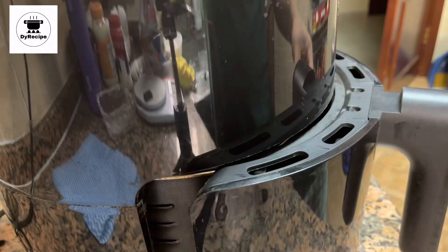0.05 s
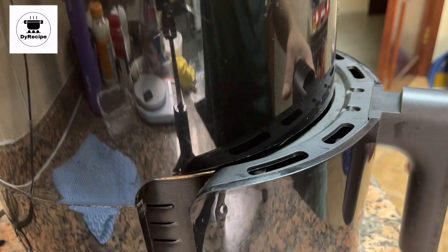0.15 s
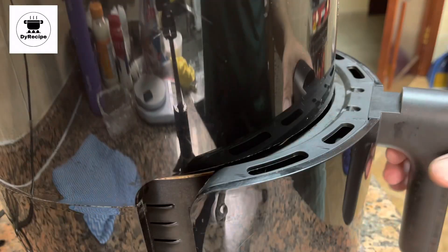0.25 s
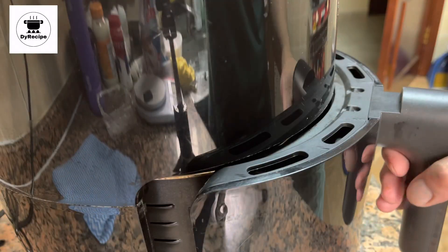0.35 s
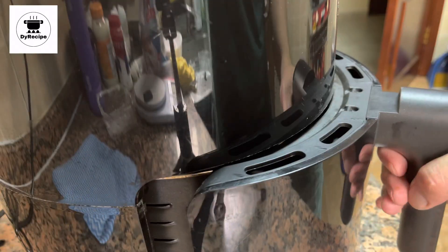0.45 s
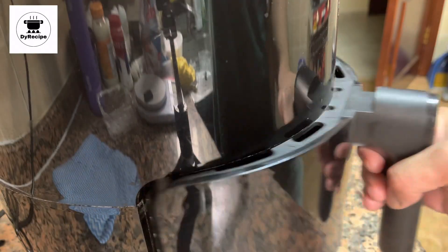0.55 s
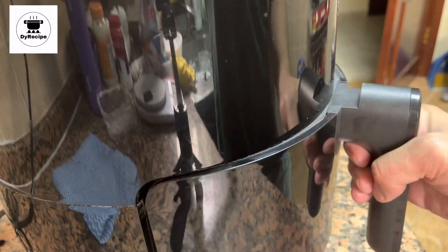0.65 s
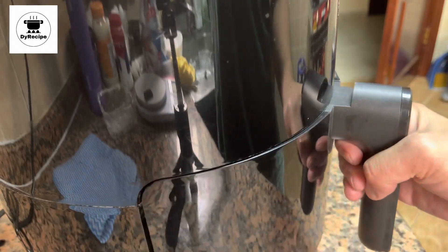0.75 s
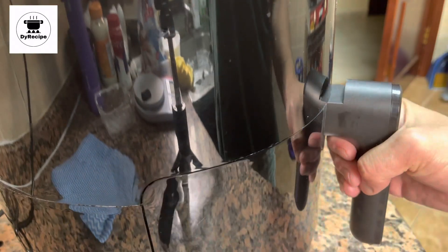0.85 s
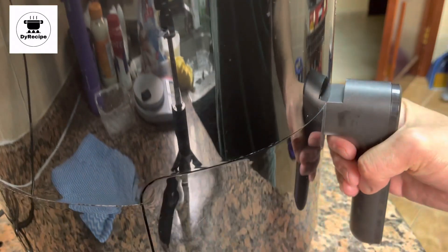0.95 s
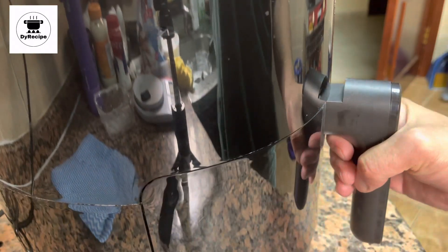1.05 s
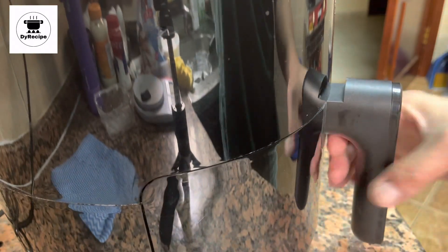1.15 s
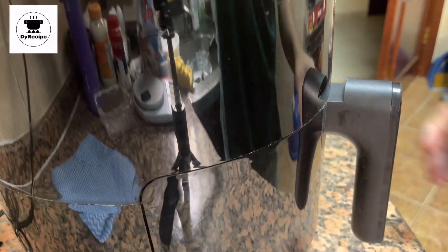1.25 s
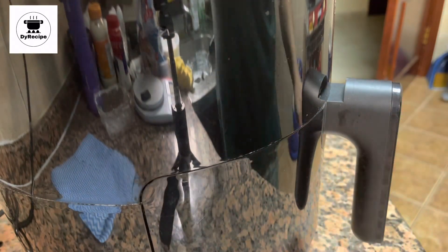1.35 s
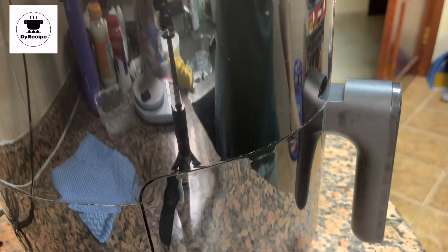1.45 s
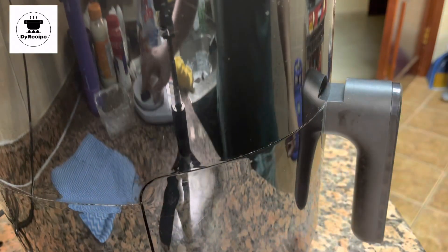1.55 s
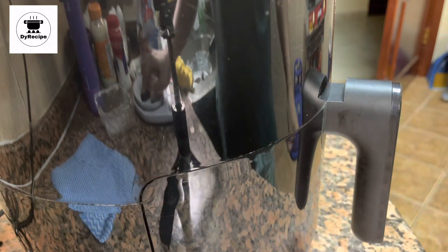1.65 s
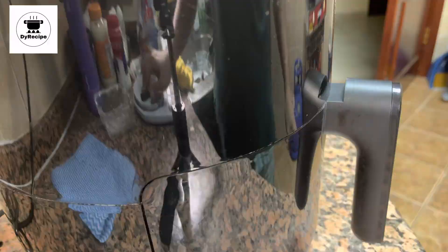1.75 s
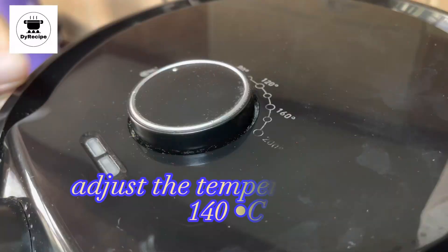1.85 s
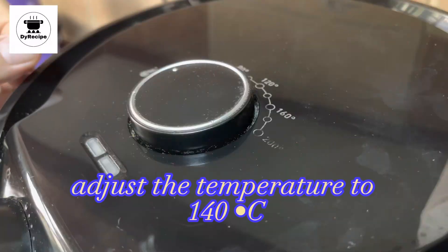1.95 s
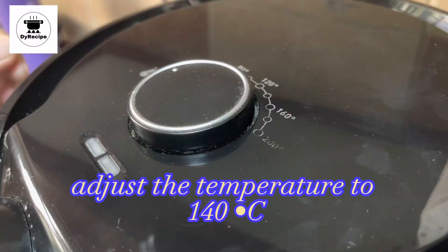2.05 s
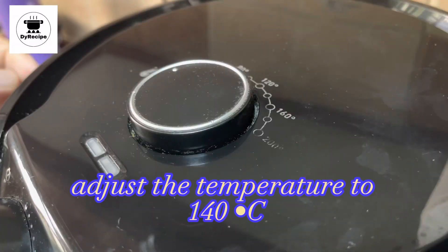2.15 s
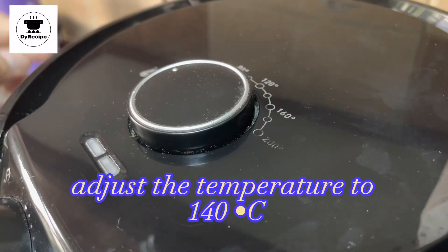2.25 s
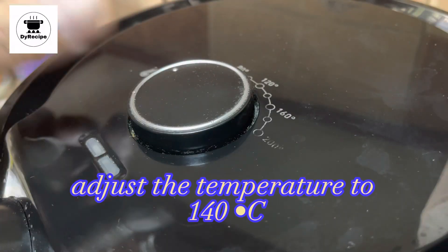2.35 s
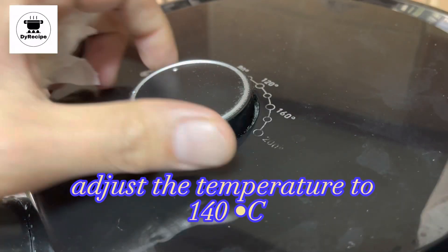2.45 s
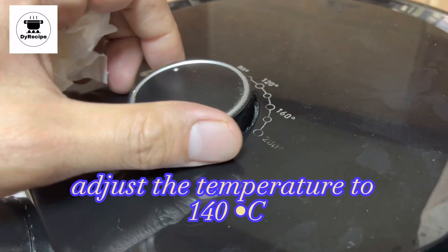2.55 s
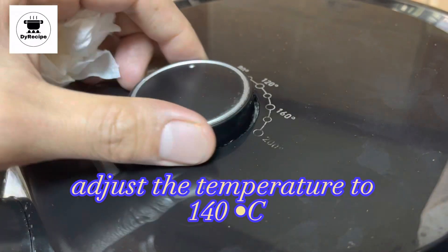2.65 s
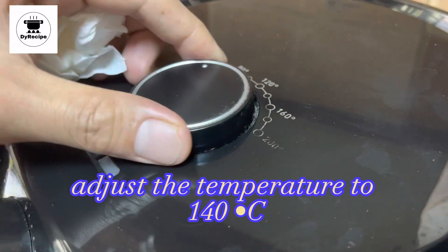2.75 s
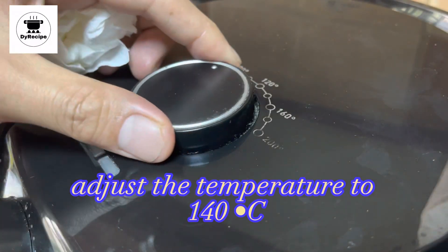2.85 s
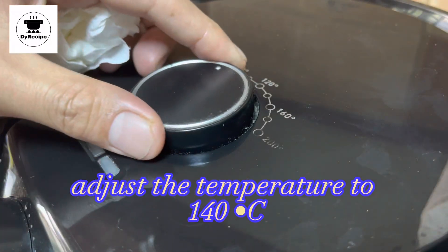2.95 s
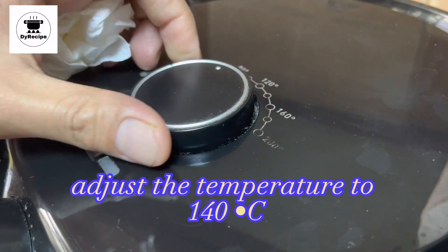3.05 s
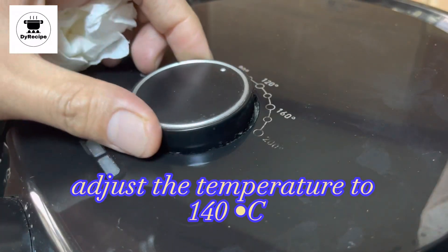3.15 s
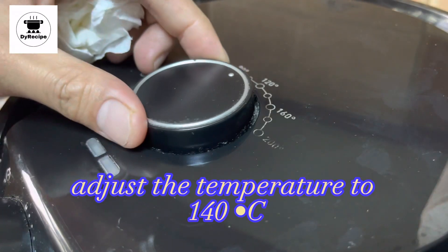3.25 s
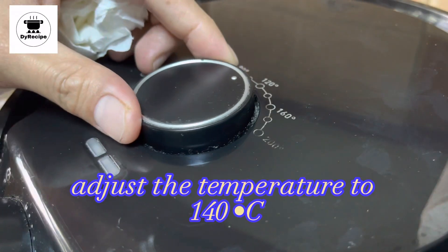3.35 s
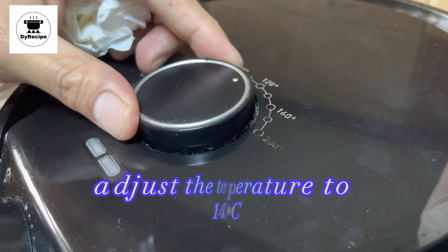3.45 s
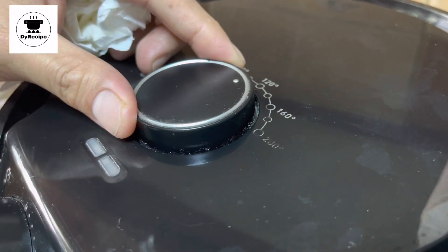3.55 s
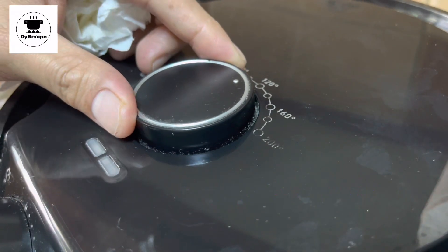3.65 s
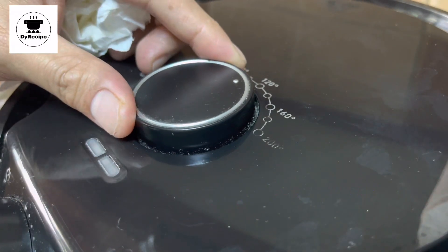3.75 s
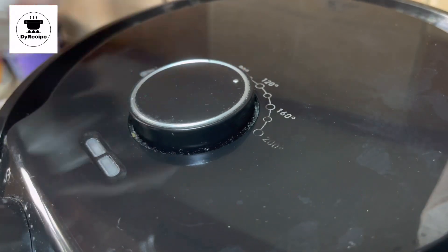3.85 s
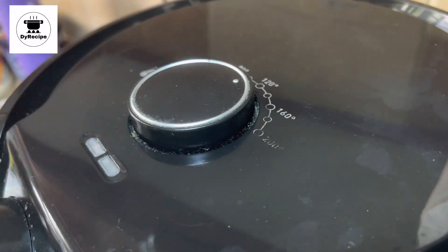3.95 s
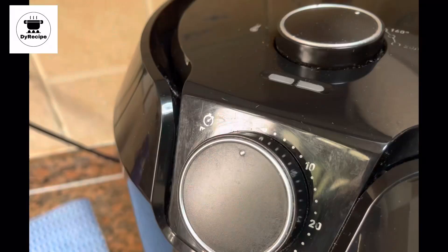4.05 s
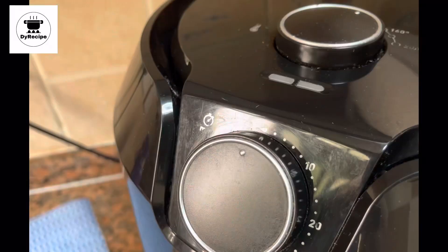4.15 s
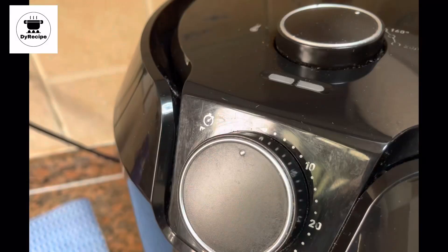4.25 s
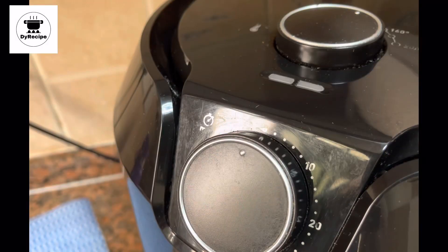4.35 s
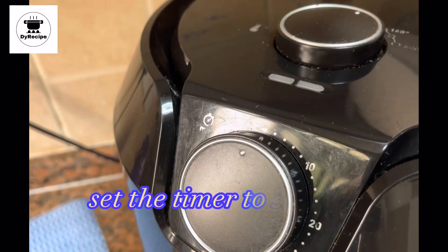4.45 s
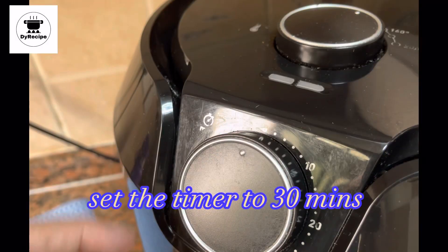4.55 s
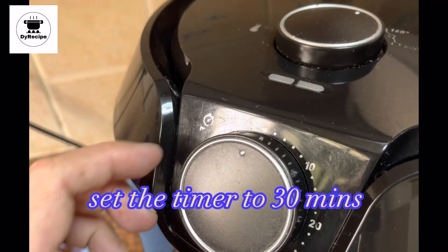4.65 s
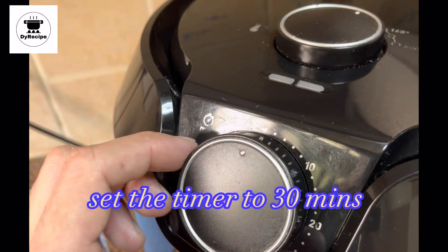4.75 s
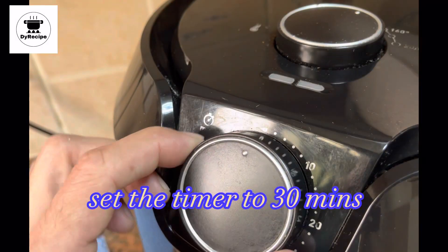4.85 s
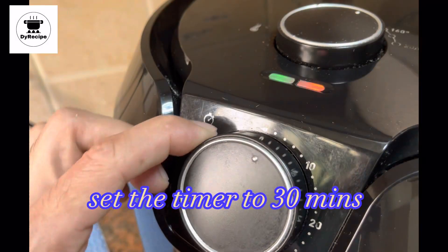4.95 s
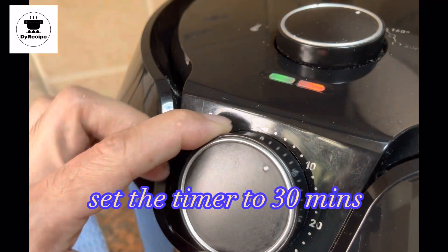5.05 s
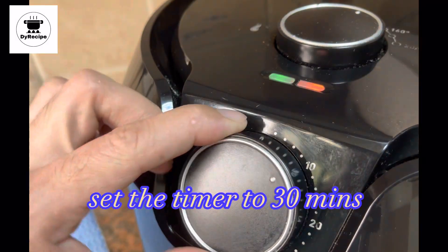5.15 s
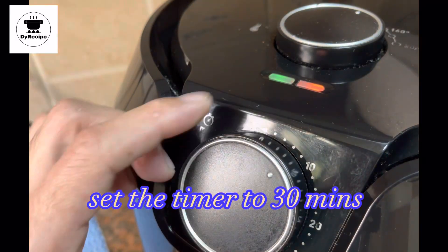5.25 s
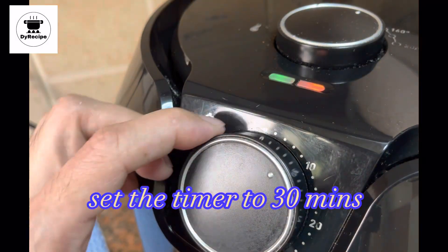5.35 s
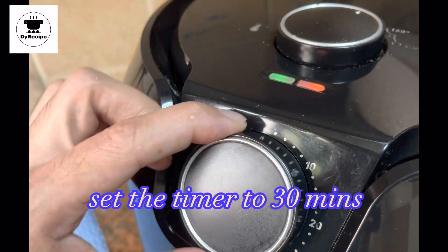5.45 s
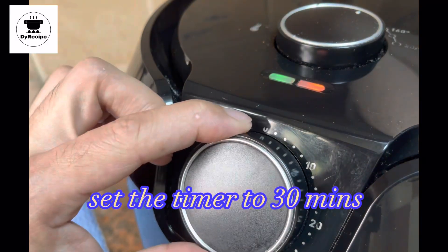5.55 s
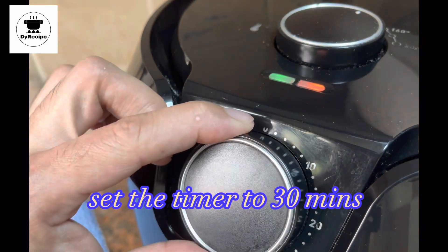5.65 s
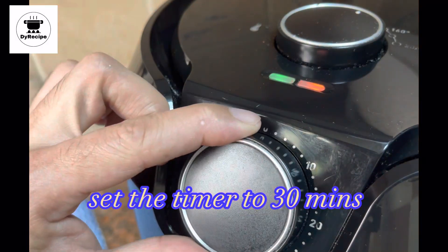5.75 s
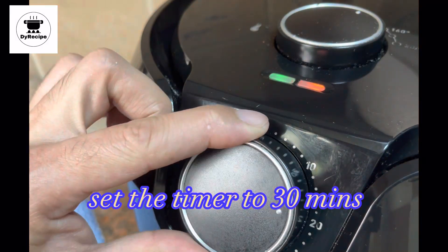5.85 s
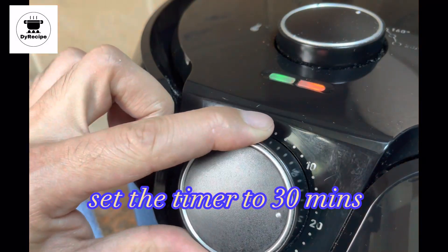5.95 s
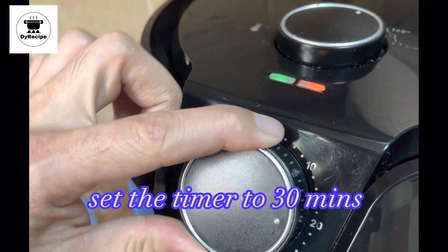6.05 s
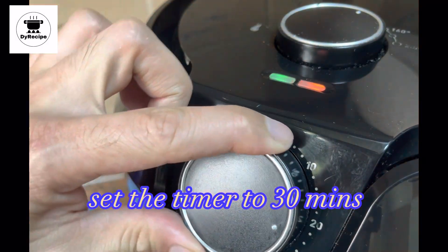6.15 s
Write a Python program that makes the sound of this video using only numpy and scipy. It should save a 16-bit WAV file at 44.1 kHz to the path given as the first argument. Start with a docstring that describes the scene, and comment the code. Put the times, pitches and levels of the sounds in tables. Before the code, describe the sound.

In a kitchen, close to the microphone, an air fryer basket rattles along its guides, catches and seats with a hollow clunk. Quiet low room rumble follows, with small finger taps and faint rubbing on a plastic knob. Then a wound timer rasps and ticks quickly, a switch snaps, and the motor hums as its fan climbs in pitch to a steady whir.

```python
"""An air fryer on a kitchen counter, close by: its basket scrapes in, catches twice and seats with a clunk.
Basket and housing are sets of fading tones set off by knocks and by uneven rubbing noise.
Fingers tap and rub the temperature knob, then wind the clockwork timer, which rasps and ticks.
The motor starts to hum, and its nine-blade fan runs up to a steady whir of blade tones and air noise.
Behind it lie a rumble, a drone and a thin hiss that step in level."""
import sys
import numpy as np
from scipy import signal
from scipy.fft import rfft, irfft, next_fast_len
from scipy.io import wavfile
from scipy.ndimage import map_coordinates

SR = 44100
rng = np.random.default_rng(int(sys.argv[2]) if len(sys.argv) > 2 else 0)


def put_to_file(sound):
    """Save the sound as 16-bit audio at rate SR, in the file named by the first command-line argument."""
    columns = np.atleast_2d(sound).T  # one column per channel
    safe = np.clip(columns, -1, 1)
    whole_steps = np.round(safe * 32767)
    wavfile.write(sys.argv[1], SR, whole_steps.astype(np.int16))


N = 272979  # length in samples
TOP_HZ = 15800  # upper limit of the sound

# basket hitting its guides and latch: (t/s, ring level/dB, thud level/dB, dull above f/Hz)
BASKET_KNOCKS = [(0.5891, -29.5, -24.5, 1800), (.599, -36.5, -27.5, 1800), (0.6066, -32.5, -23.5, 1900),
                 (0.7055, -46, -39, 4000), (0.7161, -39.5, -33.5, 5000), (.722, -37.5, -27, 3000),
                 (0.733, -38.5, -30, 1800), (0.849, -39, -29, 7000), (0.855, -32.5, -25.5, 7000),
                 (0.861, -25.5, -25, 6000), (0.8693, -23, -21, 8000), (.876, -27.5, -27, 7000)]
# basket rubbing along the guides; rise and fall are times for 60 dB:
# (peak t/s, shudder level/dB, rasp level/dB, rise t/s, fall t/s)
BASKET_SCRAPES = [(0.485, -56.5, -69.5, 0.16, 0.5), (0.535, -50.5, -52.5, 0.042, 0.21),
                  (.598, -43.5, -46.5, 0.28, 0.16), (0.717, -29.5, -39, 0.085, 0.09),
                  (0.854, -27, -29, 0.033, 0.076), (0.868, -27, -22.5, 0.03, 0.073),
                  (0.907, -49.5, -57, 0.15, 0.18), (1.114, -57, -63, 0.24, 0.22)]
# colour of plastic rubbing on metal: (f/Hz, level/dB)
RASP_COLOUR = [(500, -18), (1200, -5.5), (2000, -1), (3000, -3), (4000, -7.5), (5200, -5), (6300, -8.5),
               (7700, -4.5), (9300, -5), (11600, -8.5), (13500, -41)]
KNOCK_LOW_HZ = 85  # the knocks carry little below this


def basket(grit_db=3, judder_db=2, thud_db=9.5):
    """Knocks and stick-slip shudder ring the basket, differently each time; the rubbing also rasps directly."""
    now, knocks, rubbing, rasp = clock(), np.zeros((2, N)), 0, 0
    for s, ring_db, dense_db, dull_hz in BASKET_KNOCKS:
        blow = amp(ring_db) * ring() + amp(dense_db) * thud()
        band = (KNOCK_LOW_HZ, min(dull_hz, TOP_HZ))
        b, a = signal.butter(2, band, 'bandpass', fs=SR)
        add(knocks, s, signal.lfilter(b, a, blow))
    # fine grit and slower judder make the rubbing uneven
    slips = unit(amp(grit_db * wobble(900) + judder_db * wobble(150)))
    force = slips * rng.standard_normal(N)
    for s, shudder_db, rasp_db, rise, fall in BASKET_SCRAPES:
        push = fade(abs(now - s), np.where(now < s, rise, fall))
        body = ring() + amp(thud_db) * thud()
        body = body / np.linalg.norm(body.mean(0))
        shudder = signal.oaconvolve((push * force)[None], body, axes=1)[:, :N]
        rubbing = rubbing + amp(shudder_db) * shudder
        rasp = rasp + amp(rasp_db) * push
    rasp_noise = boxed(noise(RASP_COLOUR, -1.2), t60=0.055, wet_db=-1)
    return pan(5.5) * (knocks + rubbing) + pan(2) * rasp * slips * rasp_noise


# modes of the basket in its housing: (f/Hz, level/dB, 60 dB decay t/s)
BASKET_MODES = [(368, -8, .06), (500, -4, .09), (560, -11, .06), (625, -5, .08), (676, 0, .06),
                (796, 4, .06), (977, -3, .07), (1092, -12, .06), (1342, -13, .06), (1520, -13, .07),
                (1581, -11, .07), (1790, -19, .06), (1924, -16, .07), (2065, -20, .06), (2482, -15, .08),
                (2770, -20, .06), (2950, -17, .05), (3260, -18, .05), (4170, -21, .06)]


def ring(spread=0.88, vary_db=2, detune=0.0024):
    """The basket's answer to one blow: its modes shift with each blow and differ in phase left and right."""
    t, out = clock()[:SR // 5], 0
    for hz, db, t60 in BASKET_MODES:
        level = amp(db + vary_db * rng.standard_normal())
        cycles = hz * (1 + detune * rng.standard_normal()) * t + rng.random()
        side_phase = spread * rng.standard_normal((2, 1))
        out = out + level * fade(t, t60) * np.sin(2 * np.pi * cycles + side_phase)
    return out


# colour of the basket's dense, quickly damped modes: (f/Hz, level/dB)
THUD_COLOUR = [(30, -19.5), (90, -1), (250, 1.5), (350, -1.5), (470, -3.5), (620, 5), (1000, 0.5),
               (1700, -4), (2500, -11.5), (6000, -24.5), (12000, -42.5), (14000, -67.5)]


def thud(t60=0.025):
    """The basket's dense modes, which die at once, as a short burst of noise."""
    t = clock()[:SR // 5]
    return fade(t, t60) * noise(THUD_COLOUR, 0.081, size=len(t))


# hollow booms of the housing: (t/s, f/Hz, level/dB, swell t/s, 60 dB decay t/s)
HOUSING_BOOMS = [(0.587, 240.3, -17.5, 0.02, 0.11), (0.591, 162.5, -22.5, 0.0054, 0.13),
                 (.708, 190.7, -26, 0.034, 0.057), (.718, 120, -26.5, 0.018, .06),
                 (0.859, 192.3, -19, 0.019, 0.069), (0.857, 116.7, -19.5, 0.0086, 0.13)]
LINGER_HZ, LINGER_DB, LINGER_T60 = 199.4, -48.5, 2.5  # the shell rings on after the basket seats; T60 in s


def housing(lag_s=.0005):
    """Clunks make the hollow housing boom, reaching the left side first; the last leaves it ringing faintly."""
    out = np.zeros((2, N))
    t = np.maximum(clock()[:SR] + lag_s * np.array([[.5], [-.5]]), 0)
    for s, hz, db, swell, t60 in HOUSING_BOOMS:
        shape = np.minimum(t / swell, 1) * fade(np.maximum(t - swell, 0), t60)
        add(out, s, amp(db) * shape * np.sin(2 * np.pi * hz * t))
    linger = amp(LINGER_DB) * fade(t, LINGER_T60) * np.sin(2 * np.pi * LINGER_HZ * t)
    add(out, HOUSING_BOOMS[-1][0], linger)
    return pan(5.5) * out


# fingers on handle and knobs: (t/s, click level/dB, knock f/Hz, knock level/dB, 60 dB decay t/s)
FINGER_TAPS = [(1.071, -64, 812, -52, 0.03), (1.180, -50, 1590, -43.5, 0.016),
               (1.593, -72, 2980, -66, 0.06), (1.61, -70.5, 1200, -63, 0.092),
               (1.68, -47.5, 1280, -53.5, 0.061), (1.7687, -51, 1146, -43.5, 0.018),
               (1.815, -63, 300, -47, 0.012), (1.85, -57.5, 284, -54.5, 0.12),
               (2.356, -65, 2430, -50.5, 0.01), (2.448, -70, 2240, -66, 0.065),
               (2.702, -37, 402, -53, 0.034), (2.837, -57, 3000, -57, 0.019), (2.999, -62, 373, -51, 0.1),
               (3.116, -62, 1986, -67, 0.093), (3.363, -64.5, 2350, -59, 0.07),
               (3.83, -57.5, 360, -54, 0.2), (3.903, -56, 3630, -57.5, 0.011),
               (3.967, -61, 8400, -60.5, 0.1), (4.056, -45, 1598, -49, 0.011),
               (4.659, -72, 674, -58.5, 0.019), (5.087, -45, 1940, -44.5, 0.031),
               (5.2152, -42, 940, -46, 0.016), (5.2938, -80, 2030, -59.5, .03)]
# colour of the bright click: (f/Hz, level/dB)
CLICK_COLOUR = [(350, -1), (600, -5), (900, 9.5), (1700, -4), (2400, 6), (4000, 1), (4840, 8.5), (5400, -2),
                (6150, 6), (6900, -2), (9000, 12), (10300, 4), (11400, 12), (12200, -31), (13200, -18),
                (15000, -23)]


def taps(skirt_db=-13, brush_db=-21, brush_t60=0.12, swell=0.3, lead=.05):
    """A finger brushes the plastic and lands: a bright click over a dull knock; long ones swell more slowly."""
    out, t = np.zeros((2, N)), clock()[:SR // 5] - lead
    for s, click_db, hz, knock_db, t60 in FINGER_TAPS:
        skirt = skirt_db * np.sqrt(t60 / 0.027)  # a longer ring is a narrower one
        colour = [(hz / 8, 1.5 * skirt), (hz / 2.4, skirt), (hz, 0), (hz * 2, skirt), (hz * 8, 4 * skirt)]
        knock = noise(colour, -4, size=len(t))
        click = noise(CLICK_COLOUR, -1.6, size=len(t))
        landing = fade(abs(t), np.where(t < 0, swell * t60, t60))
        brush = amp(brush_db) * fade(abs(t), brush_t60)
        add(out, s - lead, (landing + brush) * (amp(click_db) * click + amp(knock_db) * knock))
    return out


# fingers rubbing round the temperature knob: (start t/s, end t/s, level/dB, swell in dB per s)
KNOB_STROKES = [(2.37, 2.68, -69, 2), (2.74, 2.95, -71.5, 6), (3.08, 3.42, -66.5, -11)]
# colour of skin on plastic: (f/Hz, level/dB)
RUB_COLOUR = [(470, -21), (800, 0), (4380, -2.5), (4790, -8), (6890, -7), (9570, -5), (11100, -2),
              (12000, -40), (15600, -48), (22000, -120)]
# resonances of the knob's ridges: (f/Hz, width f/Hz, level/dB)
KNOB_RIDGES = [(2300, 300, -0.5), (2940, 150, -4), (6050, 300, 0), (9100, 210, 5), (9550, 180, 9)]
RUB_RISE_S, RUB_FALL_S = .3, 0.48  # times for 60 dB


def knob(grit_db=3, catch_db=2):
    """Fingertips rub unevenly as they turn the temperature knob."""
    grain = unit(amp(grit_db * wobble(400) + catch_db * wobble(29.74)))
    rub = bumps(noise(RUB_COLOUR, -0.57), KNOB_RIDGES)
    return turning(KNOB_STROKES, RUB_RISE_S, RUB_FALL_S) * grain * rub


# rasping of the timer: a finger touch, twists and the tail of a tick:
# (start t/s, end t/s, level/dB, swell in dB per s)
TIMER_RASPS = [(4.88, 4.9, -79.5, 202), (4.926, 5.16, -50, 10), (5.334, 5.34, -65, 0),
               (5.425, 5.562, -48, -70), (5.608, 5.63, -69, -100), (5.675, 5.94, -59.5, 13),
               (6.03, 6.19, -56, 15)]
# ticks of the timer ratchet: (t/s, tick level/dB, thump level/dB)
RATCHET_TICKS = [(4.9256, -32.5, -55), (5.072, -34, -50), (5.1325, -39, -46), (5.146, -42, -49),
                 (5.5235, -36, -43), (5.547, -47, -56), (5.6017, -35, -35), (5.6539, -36, -31),
                 (5.687, -37, -41), (5.71, -40, -52), (5.7285, -33, -40), (5.7523, -40, -41),
                 (5.7988, -35, -30), (5.8279, -37.5, -47), (5.9179, -35, -39), (5.9437, -44, -37),
                 (5.9919, -36, -35), (6.0178, -37.5, -48), (6.0435, -38.5, -29.5), (6.065, -42, -33.5)]
# colour of the pawl's tick: (f/Hz, level/dB)
PAWL_COLOUR = [(500, -5), (1200, 5), (3000, 0.5), (4500, 1.5), (5400, 4.5), (9200, 2), (10900, 6),
               (12200, 0), (14000, -37)]
# colour of the rasping gear teeth: (f/Hz, level/dB)
GEAR_COLOUR = [(300, -12), (800, -6), (2000, -5.5), (3000, -9.5), (3700, -9.5), (5600, -8.5), (7000, -10.5),
               (9000, -5), (10400, -0.5), (11400, -3), (12200, -9), (13500, -41.5)]
# resonances of the clockwork's plates and spring: (f/Hz, width f/Hz, level/dB)
CLOCKWORK_RINGS = [(2906, 190, 8), (5350, 160, 8.5), (5880, 150, 8), (7800, 120, 7), (8450, 230, 7),
                   (8980, 110, 6), (9100, 100, 4), (10600, 210, 8), (11030, 280, 6)]
RASP_RISE_S, RASP_FALL_S = 0.061, 0.065  # times for 60 dB
THUMP_HZ, THUMP_RISE_S, THUMP_T60 = 165.5, 0.0059, .11  # each tick jolts the hollow housing, near this pitch


def timer(catch_db=5, catch_s=0.0015, crest_db=7, tick_t60=0.028, snap_db=2, snap_t60=0.0023):
    """Gear teeth rasp, softer as the pawl rides up; then it snaps over with a tick and a thump."""
    now, t = clock(), clock()[:SR // 6]
    teeth = boxed(bumps(noise(GEAR_COLOUR, 0), CLOCKWORK_RINGS), t60=0.11, wet_db=0)
    grain = unit(amp(1.6 * wobble(700) + .5 * wobble(110)))
    # the rasp sinks just before each tick
    riding = sum(np.exp(-((now - row[0] + catch_s) / catch_s) ** 2) for row in RATCHET_TICKS)
    out = turning(TIMER_RASPS, RASP_RISE_S, RASP_FALL_S) * amp(-catch_db * riding) * grain * teeth
    tick = np.minimum(t / .0004, 1) * (fade(t, tick_t60) + amp(snap_db) * fade(t, snap_t60))
    jolt = np.minimum(t / THUMP_RISE_S, 1) * fade(t, THUMP_T60)
    for s, db, thump_db in RATCHET_TICKS:
        add(out, s, amp(db - crest_db) * tick * noise(PAWL_COLOUR, -2.7, size=len(t)))
        thump_hz = THUMP_HZ * (1 + 0.083 * rng.standard_normal())
        add(out, s, amp(thump_db) * jolt * np.sin(2 * np.pi * thump_hz * t))
    return pan(1.0) * out


# the timer's switch snaps, then the knob springs back: (t/s, level/dB, struck part f/Hz, 60 dB decay t/s)
SWITCH_SNAPS = [(5.0864, -35, 1920, 0.0076), (5.207, -51, 1330, 0.021), (5.2147, -37, 1230, 0.0053),
                (5.218, -39.5, 940, 0.017)]


def switch(upper=1.33, upper_db=-4, crack_db=-9, crack_t60=0.0061):
    """Small stiff parts snap home: two quickly damped modes under a short crack."""
    out, t = np.zeros((2, N)), clock()[:SR // 12]
    for s, db, hz, t60 in SWITCH_SNAPS:
        modes = np.sin(2 * np.pi * hz * t) + amp(upper_db) * np.sin(2 * np.pi * upper * hz * t)
        crack = amp(crack_db) * fade(t, crack_t60) * noise(PAWL_COLOUR, -1.5, size=len(t))
        add(out, s, amp(db) * (modes * fade(t, t60) + crack))
    return out


# tones of the turning fan: (multiple of the shaft speed, level/dB)
FAN_ORDERS = [(7, -17), (8, -18), (9, -1), (16, -37), (18, -12.5), (20, -21), (24, -21), (27, -16)]
# how the housing passes the blade tone: (f/Hz, level/dB)
BLADE_TONE_PATH = [(60, -38.5), (120, -16), (150, -6.5), (200, -6), (225, -7), (262, -25), (285, -9),
                   (304, 2), (345, -0.5), (372, 1), (390, -4.5)]
# magnetic hum of the motor: (f/Hz, level/dB)
MAINS_HUM = [(100, -23), (200, -2.5), (300, -22), (400, -28)]
# panels set ringing by the motor: (f/Hz, width f/Hz, level/dB)
PANEL_RINGS = [(572, 62, 15.5), (677.5, 15, 18.5), (830, 39, 11), (920, 29, 2)]
# colour of the air in the cooking chamber: (f/Hz, level/dB)
CHAMBER_COLOUR = [(40, -38), (85, -11), (130, -6), (168, 3), (205, -4.5), (240, -14), (320, -13),
                  (420, -22.5), (900, -53), (3000, -100)]
# colour of the air leaving the vent: (f/Hz, level/dB)
VENT_COLOUR = [(150, -43), (330, 14), (480, -5.5), (600, -1.5), (950, 2.5), (1500, -5), (3000, -10),
               (6000, -12.5), (12000, -20), (14000, -68)]
BLADE_DB = -46.5  # blade tones before the housing shapes them
FULL_BLADE_HZ = 385  # blades passing per second at full speed


def fan(flutter_db=2, jitter=0.0059):
    """The motor soon hums; blade tones, broken up by eddies, and air noise follow the fan's speed."""
    speed = fan_speed()
    blade_hz = FULL_BLADE_HZ * speed
    tone = amp(BLADE_DB + along(BLADE_TONE_PATH, blade_hz)) * (speed > 0)
    turns = np.cumsum(blade_hz * (1 + jitter * wobble(30))) / SR / 9  # nine blades per shaft turn
    tones = 0
    for k, db in FAN_ORDERS:
        # the high orders only sing near full speed, and differ in phase left and right
        high = k > 10
        phase = rng.random() + high * 0.412 * rng.standard_normal((2, 1))
        eddies = 1 + .27 * (wobble(75) + 1j * wobble(75))
        wave = np.imag(eddies * np.exp(2j * np.pi * (round(k) * turns + phase)))
        tones = tones + amp(db + flutter_db * wobble(16)) * speed ** (3 * high) * wave
    hum = 0
    for hz, db in MAINS_HUM:
        hum = hum + amp(db + 5 * wobble(20)) * np.sin(2 * np.pi * (hz * clock() + rng.random()))
    buzz_colour = [(200, -11.0), (350, 3.0), (500, 0.0), (1000, -4.0), (2000, -3.5), (6000, -38), (14000, -70)]
    buzz = amp(-10) * unit(bumps(noise(buzz_colour, -0.58), PANEL_RINGS))
    motor = np.sqrt(2) * (tone * tones + motor_current() * (hum + buzz))
    chamber = amp(-47.0 + 2.5 * wobble(25)) * speed ** 1.2 * noise(CHAMBER_COLOUR, -8.5)
    vent = amp(-49.5) * speed ** 3.34 * boxed(noise(VENT_COLOUR, -0.63), t60=0.16, wet_db=0.0)
    return pan(2.4) * (motor + chamber + vent)


START_S, RUN_UP_S = 5.04, .78  # start of the fan's run-up; time scale of the run-up
DRAG_BEND, SETTLE = 0.94, 10  # drag bends the climb (1 = straight); sharpness of its levelling off


def fan_speed():
    """Share of full speed: the motor accelerates almost evenly, then levels off."""
    climb = (np.maximum(clock() - START_S, 0) / RUN_UP_S) ** DRAG_BEND
    return climb / (1 + climb ** SETTLE) ** (1 / SETTLE)


HUM_DB, SURGE_DB = -56, -47  # hum when running, and the extra under the starting current
HUM_DELAY_S, HUM_RISE_S = 0.0355, 0.035  # the hum's wait after the fan's start, and its time for 60 dB
# the surge peaks this long after the fan's start; rise and fall are times for 60 dB
SURGE_PEAK_S, SURGE_RISE_S, SURGE_FALL_S = 0.13, 0.28, 0.098


def motor_current():
    """Level of the hum: the starting current swells, then gives way to the steady running current."""
    peak = START_S + SURGE_PEAK_S
    surge = amp(SURGE_DB) * stroke(peak, peak, SURGE_RISE_S, SURGE_FALL_S)
    return (surge + amp(HUM_DB)) * stroke(START_S + HUM_DELAY_S, N / SR, HUM_RISE_S, HUM_RISE_S)


# how fast the room's echo dies: (f/Hz, 60 dB decay t/s)
ROOM_DECAY = [(150, 0.96), (600, 0.54), (2500, 0.45), (10000, 0.066)]


def room(x):
    """The kitchen's hard walls answer with a noise-like tail; the treble dies first."""
    hz, t, z = signal.stft(rng.standard_normal((2, SR // 2)), SR, nperseg=256)
    tail = signal.istft(z * fade(t, along(ROOM_DECAY, hz)[:, None]), SR, nperseg=256)[1]
    return signal.fftconvolve(x, tail / np.linalg.norm(tail[0]), axes=1)[:, :N]


# steps in the background's level: (from t/s, rumble level/dB, hiss level/dB, drone level/dB)
BACKGROUND_STEPS = [(0, -58.5, -72, -68), (1.8, -58.5, -68.5, -59.5), (4.069, -68.5, -80.5, -79.5)]
# colour of the low rumble: (f/Hz, level/dB)
RUMBLE_COLOUR = [(20, -20), (45, -14.5), (65, 0), (100, -3), (140, 2), (180, -8), (250, -17), (350, -16),
                 (480, -29.5), (700, -27), (1500, -72)]
# colour of the hiss: (f/Hz, level/dB)
HISS_COLOUR = [(300, 4.5), (600, 7.5), (1000, 3.5), (2000, -2), (3000, -0.5), (4000, -6), (5400, 1.5),
               (6700, -5.5), (8000, 1.5), (9500, 0.5), (10900, -4.5), (11800, -29.5), (14000, -41)]
# narrow whistles in the hiss: (f/Hz, width f/Hz, level/dB)
HISS_WHISTLES = [(3100, 70, 5.5), (3120, 64, 4), (3830, 75, 3.5), (4690, 110, 7), (4830, 70, 14.5),
                 (7430, 190, 6)]
WHISTLE_HZ, WHISTLE_DB = 4880, -14  # centre of the strongest thin whistle; its mean level against the hiss


def kitchen(drone_hz=150, waver_db=5.5, waver_hz=7):
    """Low rumble, a wavering drone, a faint whine of steady pitch and a thin whistling hiss."""
    starts, *levels = np.transpose(BACKGROUND_STEPS)
    step = np.searchsorted(starts[1:], clock())
    rumble_db, hiss_db, drone_db = np.array(levels)[:, step]
    whine = amp(-18.5 + 0.84 * wobble(7.6)) * np.sin(2 * np.pi * 446 * clock())
    rumble = amp(rumble_db + 2.1 * wobble(7.4)) * (noise(RUMBLE_COLOUR, -5.5) + whine)
    drone_wave = unit(np.sin(2 * np.pi * np.cumsum(drone_hz + waver_hz * wobble(12)) / SR))
    drone = amp(drone_db + waver_db * wobble(12)) * drone_wave
    whistle_wave = np.sin(2 * np.pi * np.cumsum(WHISTLE_HZ + 32 * wobble(120)) / SR)
    whistle = amp(WHISTLE_DB + 3 * wobble(40)) * whistle_wave
    hiss = boxed(bumps(noise(HISS_COLOUR, -1.3), HISS_WHISTLES), t60=0.037, wet_db=-0.5) + whistle
    return pan(1) * (rumble + drone + amp(hiss_db + 2.4 * wobble(10)) * hiss)


def amp(db):
    """Decibels to gain."""
    return 10 ** (np.asarray(db) / 20)


def unit(x):
    """Scale to rms 1."""
    return x / np.sqrt(np.mean(x ** 2) + 1e-20)


def clock():
    """The time of each sample, in seconds."""
    return np.arange(N) / SR


def along(points, hz):
    """Read a curve of (Hz, value) points on a log frequency axis."""
    f, v = np.transpose(points)
    return np.interp(np.log(hz + 1), np.log(f + 1), v)


def wobble(rate):
    """A smooth random curve, rate knots a second."""
    return map_coordinates(rng.standard_normal(int(N * rate / SR) + 4), [clock() * rate], order=2)


def filtered(x, response):
    """Shape a sound by a gain that depends on frequency."""
    n = x.shape[-1]
    m = next_fast_len(n + 8192)
    return irfft(rfft(x, m) * response(np.fft.rfftfreq(m, 1 / SR)), m)[..., :n]


def pan(left_db):
    """Channel gains for a left-minus-right level."""
    return amp([[left_db / 2], [-left_db / 2]])


def noise(spectrum, side_db, size=N):
    """Coloured stereo noise whose centre has rms 1."""
    mid, side = filtered(rng.standard_normal((2, size)), lambda hz: amp(along(spectrum, hz)))
    return unit(mid) + np.array([[1], [-1]]) * amp(side_db) * unit(side)


def fade(t, t60):
    """Exponential decay, 60 dB in t60."""
    return np.exp(-np.log(1000) * t / t60)


def add(track, s, sound):
    """Mix a short sound in at time s."""
    part = track[:, round(s * SR):][:, :sound.shape[-1]]
    part += sound[..., :part.shape[1]]


def bumps(x, peaks):
    """Raise (or lower) a sound around each (Hz, width, dB) resonance."""
    def response(hz):
        return amp(sum(db / (1 + (2 * (hz - centre) / width) ** 2) for centre, width, db in peaks))
    return filtered(x, response)


def boxed(x, t60, wet_db):
    """Many quick reflections between hard surfaces give a sound a fine fixed comb."""
    t = clock()[:SR // 8]
    echoes = rng.standard_normal((2, len(t))) * fade(t, t60)
    echoes *= amp(wet_db) / np.linalg.norm(echoes[0])
    return unit(x + signal.fftconvolve(x, echoes, axes=1)[:, :N]) * np.std(x)


def stroke(start, end, rise, fall):
    """Attack, hold from start to end, release; rise and fall are times for 60 dB."""
    now = clock()
    return fade(np.maximum(start - now, 0), rise) * fade(np.maximum(now - end, 0), fall)


def turning(rows, rise, fall):
    """Level of rubbing or rasping in strokes, each of which swells, sags or holds steadily."""
    level = 0
    for start, end, db, swell in rows:
        held = np.clip(clock(), start, end) - start
        level = level + amp(db + swell * held) * stroke(start, end, rise, fall)
    return level


FRYER_ROOM_DB, BOOM_ROOM_DB = -24, -21.5  # echo of the fryer's sounds, and of its low booms


def scene():
    """The fryer, its echo and the kitchen around it."""
    fryer = basket() + taps() + knob() + timer() + switch() + fan()
    booms = housing()
    echo = room(amp(FRYER_ROOM_DB) * fryer + amp(BOOM_ROOM_DB) * booms)
    return fryer + booms + echo + kitchen()


DIP_HALF_S, DIP_DB = 0.0086, -45  # half-length and depth of each dip


def record(dry):
    """The level dips briefly at each step of the background; nothing above the upper limit is kept."""
    dips = sum(np.exp(-((clock() - row[0]) / DIP_HALF_S) ** 4) for row in BACKGROUND_STEPS[1:])
    return filtered(dry * amp(DIP_DB * dips), lambda hz: hz < TOP_HZ)


dry = scene()
out = record(dry)
put_to_file(out)
```